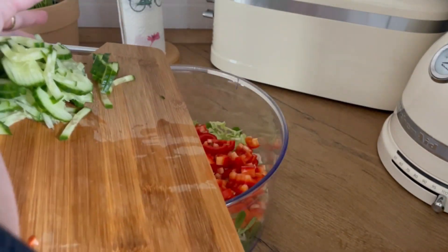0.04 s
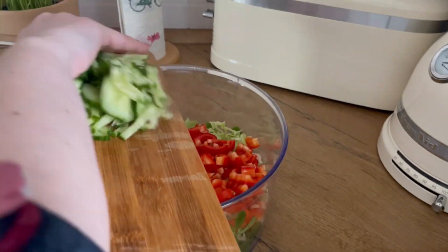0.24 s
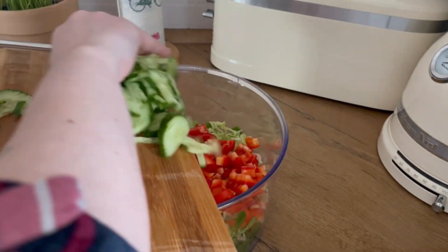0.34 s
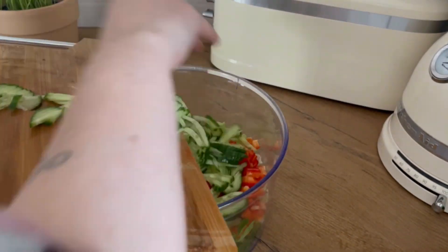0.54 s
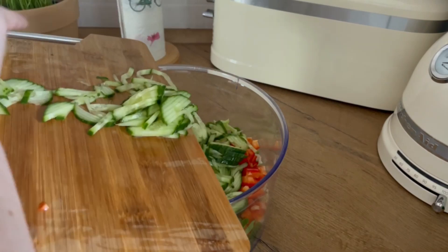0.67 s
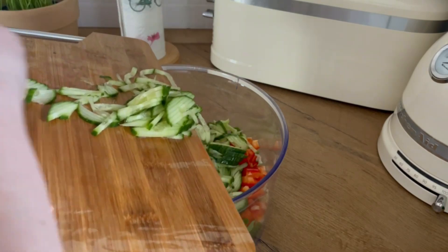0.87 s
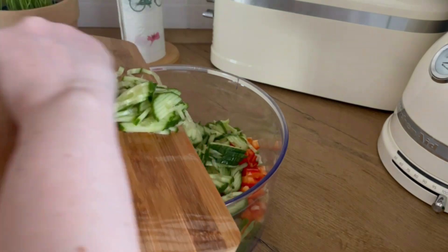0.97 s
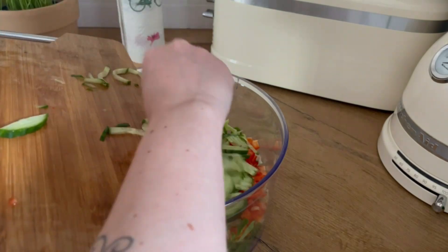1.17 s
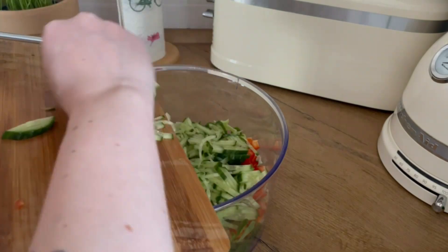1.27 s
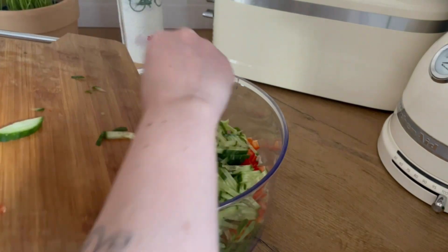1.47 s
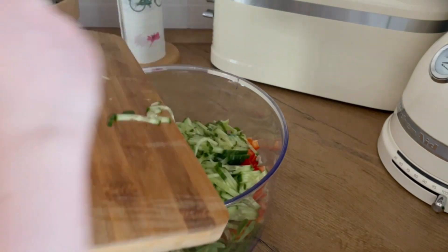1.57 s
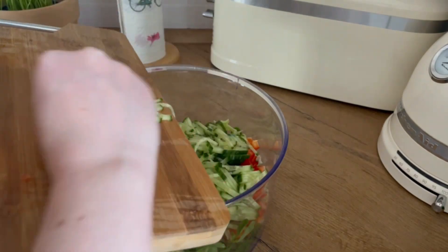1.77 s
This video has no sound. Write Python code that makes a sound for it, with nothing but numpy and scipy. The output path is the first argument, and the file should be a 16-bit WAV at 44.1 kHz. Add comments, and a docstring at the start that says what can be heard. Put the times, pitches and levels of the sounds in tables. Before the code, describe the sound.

Short, hissy scrapes and light taps of a steel blade on a wooden board, heard close in a kitchen. One loud knock of board on bowl comes first, then soft plops of vegetables, over a faint appliance hum.

```python
"""Scraping vegetables into a bowl

A steel blade taps a wet wooden board and drags over it in short strokes; friction rings the blade
and the wet wood hisses. The board knocks on the bowl, chopped pieces plop in, a sleeve rustles.
Behind it, in a small kitchen, an appliance hums on two close tones that beat slowly."""
import sys
import numpy as np
from scipy import signal
from scipy.io import wavfile
from scipy.ndimage import uniform_filter1d

SR = 44100
rng = np.random.default_rng(int(sys.argv[2]) if len(sys.argv) > 2 else 0)


def unload_wav(signal):
    """Save mono or channel-first audio to the path in sys.argv[1] as 16-bit WAV at rate SR, clipped to [-1, 1]."""
    wavfile.write(
        sys.argv[1],
        SR,
        np.round(np.clip(np.atleast_2d(signal).T, -1, 1) * 32767).astype(np.int16),
    )


N = 81585
T = np.arange(N) / SR
HZ = np.fft.rfftfreq(8192, 1 / SR)
IMPACT_T = T[:2 * len(HZ)]

# room noise spectrum (frequency [Hz], gain [dB])
ROOM_NOISE_COLOUR = [(30, -46), (60, -59), (90, -14), (150, -2.5), (220, 1.5), (310, -7), (430, -2),
                     (700, -12.5), (1200, -16), (2200, -28), (4500, -36), (16000, -43)]
# blade strokes, one curve each (time [s], blade ring [dB], wet hiss [dB])
STROKES = [
    [(0, -62.5, -95), (.065, -65, -77), (.135, -54, -61), (.23, -52, -65), (.33, -54, -67),
     (.47, -66.5, -66), (.53, -90, -74), (.6, -78, -75)],
    [(.83, -49.5, -71), (.855, -61, -65), (.877, -47, -81), (.91, -55, -73), (.945, -50.5, -58),
     (1.02, -55, -57), (1.11, -54, -55), (1.143, -46, -70), (1.16, -70, -73)],
    [(1.305, -77, -64), (1.345, -58.5, -89), (1.366, -56.5, -68), (1.38, -58, -79), (1.415, -46.5, -64),
     (1.425, -63, -67)],
    [(1.652, -53.5, -60), (1.7, -46, -59.5), (1.738, -56.5, -74), (1.758, -62.5, -55), (1.82, -50.5, -72),
     (1.85, -49.5, -68)],
]
# blade resonances (frequency [Hz], width [Hz], gain [dB])
BLADE_MODES = [(1328, 42.5, 7), (1593, 215, -1), (2738, 115, 1.5), (3150, 84, 6.5), (3764, 81, 5),
               (4100, 134, 0.5), (5193, 106, 2), (6380, 380, -3), (8110, 300, -7.5), (9470, 210, -7.5)]
# scrape spectrum under the resonances (frequency [Hz], gain [dB])
SCRAPE_COLOUR = [(100, -10.5), (300, -13.5), (900, -3.5), (1500, -9), (2250, -10), (3300, -8), (5800, -9),
                 (7500, -16), (16000, -13)]
# wet wood spectrum (frequency [Hz], gain [dB])
HISS_COLOUR = [(100, -54), (1500, -16), (4000, 0.5), (7000, 2.5), (11000, 7), (13500, 1), (16000, 1.5)]
# blade catching on wood (time [s], duration sigma [s], pitch [Hz], half-width [Hz], level [dB])
CATCHES = [(0.87, 0.008, 4020, 250, -51), (0.948, 0.0057, 5150, 450, -47), (0.961, 0.0092, 3170, 119, -52),
           (1.085, 0.049, 1510, 220, -59), (1.145, 0.0052, 4770, 1500, -51),
           (1.362, 0.0054, 3090, 148, -51.5), (1.701, 0.0097, 3610, 334, -43),
           (1.708, 0.027, 1360, 150, -56), (1.728, 0.0093, 2870, 300, -51.5),
           (1.84, 0.05, 6580, 600, -54.5)]
# pieces landing (time [s], pitch [Hz], level [dB])
PLOPS = [(0, 226, -48), (0.303, 228, -38), (0.363, 232, -47), (0.412, 260, -42.5), (0.461, 230, -46),
         (.799, 250.5, -41.5), (0.984, 232.6, -40.5), (1.02, 220.6, -45), (1.16, 262, -46.5)]
# board thumps, mostly the board hitting the bowl; the row at 0.8225 s is the board ringing under the blade tap
# (time [s], level [dB], treble cutoff [Hz])
KNOCKS = [(0.2337, -27.5, 8900), (0.2353, -20, 2060), (0.2395, -17.5, 3000), (0.2481, -24, 1500),
          (0.2596, -18, 1400), (0.2634, -21.5, 1000), (0.267, -24.5, 2130), (.273, -18, 560),
          (0.403, -35.5, 900), (0.41, -41, 850), (.772, -49, 1100), (0.8225, -41, 1180),
          (1.164, -46.5, 800)]
# board and bowl resonances (frequency [Hz], width [Hz], gain [dB])
BOARD_MODES = [(244.4, 15.3, 11.5), (471, 92, -5.5), (606, 38, -3.5), (697, 52, 1.5), (875, 110, -3),
               (962, 51, 4.5), (1106, 78, -0.5), (1350, 130, -3), (1566, 62, -10), (1865, 114, 0),
               (2930, 270, 3.5)]
# knock spectrum under the resonances (frequency [Hz], gain [dB])
BOARD_COLOUR = [(60, -64.5), (150, -43), (400, -40.5), (1000, -12), (2250, -45), (3400, -11.5), (4500, -11),
                (7000, -7), (9000, -16), (16000, -13)]
# rustle envelope (time [s], level [dB])
SLEEVE_LEVELS = [(.42, -61.5), (.51, -55), (0.561, -63), (.605, -75), (.67, -65.5), (.77, -66.5),
                 (.81, -70.5), (1.16, -62.5), (1.226, -58.5), (1.27, -70), (1.43, -72), (1.47, -100)]
# rustle peaks (frequency [Hz], width [Hz], gain [dB])
SLEEVE_PEAKS = [(2670, 190, 13), (3020, 78, 15), (4170, 160, 9.5), (5050, 270, 15.5)]
# rustle spectrum (frequency [Hz], gain [dB])
SLEEVE_COLOUR = [(200, 11.5), (800, 11.5), (2000, 0.5), (7000, -3), (13000, -23)]
# blade touching down (time [s], level [dB], tilt [dB/octave], boost centre [Hz], boost [dB])
TAPS = [(0.4212, -48.5, -2, 5340, 15), (0.435, -52, 13, 6800, 11), (.643, -52.5, 0, 3230, 11),
        (0.6596, -40, 0, 3460, 7.5), (0.8223, -30, 1.5, 10200, 6.5), (1.2997, -39.5, -0.5, 3000, 1.5),
        (1.4495, -58.5, 2, 7100, 6), (1.65, -38.5, 2.5, 1310, 5.5)]
# tap chatter spectrum (frequency [Hz], gain [dB])
TAP_COLOUR = [(100, -24.5), (400, -27), (900, 4.5), (2250, -28), (3900, -3.5), (5000, 0.5), (10000, -4),
              (13000, -10), (16000, -22)]
# kitchen decay (frequency [Hz], T60 [s]); delay before the tail
ROOM_T60, ROOM_GAP_S = [(200, 0.35), (1500, 0.23), (6000, 0.1), (16000, 0.19)], 0.0013


def amp(db):
    """Decibels to gain."""
    return 10 ** (np.asarray(db) / 20)


def unit_rms(x):
    """Scale to rms 1."""
    return x / np.sqrt(np.mean(x ** 2) + 1e-20)


def unit_energy(x):
    """Scale to energy 1."""
    return x / np.linalg.norm(x)


def lookup(points, hz):
    """Interpolate over log frequency."""
    f, value = np.transpose(points)
    return np.interp(np.log(hz + 1), np.log(f), value)


def add(mix, start_s, sound):
    """Mix in at a start time."""
    part = mix[max(round(start_s * SR), 0):][:len(sound)]
    part += sound[:len(part)]


def bell(centre_hz, half_width_hz):
    """Single peak of height 1."""
    return 1 / (1 + ((HZ - centre_hz) / half_width_hz) ** 2)


def body(colour, modes=()):
    """Gain curve: broad colour plus resonances."""
    peaks = sum(amp(db) ** 2 / (1 + ((HZ ** 2 - hz ** 2) / (width_hz * (HZ + 1))) ** 2)
                for hz, width_hz, db in modes)
    return np.sqrt(amp(lookup(colour, HZ)) ** 2 + peaks)


def ring(x, gain):
    """Minimum-phase, unit-energy filter from a gain curve."""
    log_gain = np.log(np.maximum(np.r_[gain, gain[-2:0:-1]], 1e-6))
    response = np.fft.ifft(np.exp(np.conj(signal.hilbert(log_gain)))).real[:len(HZ)]
    return signal.fftconvolve(x, unit_energy(response))[:len(x)]


def appliance_hum(hz=117.3, db=-60.5, beat_hz=3.53, upper_db=-66, dip_s=0.235):
    """Two close tones beat."""
    rad_per_hz = 2 * np.pi * (T - dip_s)
    lower = amp(db) * np.sin(hz * rad_per_hz)
    upper = amp(upper_db) * np.sin((hz + beat_hz) * rad_per_hz)
    return np.sqrt(2) * (lower - upper)


def room_noise(db=-61.5):
    """Steady, dull noise."""
    return amp(db) * ring(rng.standard_normal(N), body(ROOM_NOISE_COLOUR))


def friction(slips_per_s=23000, spread_db=2, judder_db=1, judder_s=0.008):
    """Dense tiny slips of uneven size, in clumps."""
    slips = (rng.random(N) < slips_per_s / SR) * rng.standard_normal(N)
    slips *= amp(spread_db * np.minimum(rng.exponential(1, N), 4))
    knots_s = np.arange(0, 2, judder_s)
    judder = np.interp(T, knots_s, rng.standard_normal(N)[:len(knots_s)])
    return unit_rms(slips * amp(judder_db * judder))


def wet_hiss(patch_db=2.2, patch_s=0.025, patch_hz=1400):
    """Hiss whose colour wanders in random patches as wet pieces slide and let go."""
    hz, t, spectrum = signal.stft(ring(friction(), body(HISS_COLOUR)), SR, nperseg=256)
    patches = uniform_filter1d(rng.standard_normal(spectrum.T.shape), round(patch_s / t[1]), axis=0)
    patches = unit_rms(uniform_filter1d(patches, round(patch_hz / hz[1]), axis=1))
    return unit_rms(signal.istft(spectrum * amp(patch_db * patches.T), SR)[1][:N])


def wet_crackle(ticks_per_s=130, relative_db=-6, bands=6):
    """Sparse wet ticks spread over treble bands."""
    out = np.zeros(N)
    for hz in np.geomspace(3500, 14000, bands):
        ticks = (rng.random(N) < ticks_per_s / bands / SR) * rng.uniform(-1.05, 1, N)
        out += ring(ticks, bell(hz, half_width_hz=1400))
    return amp(relative_db) * unit_rms(out)


def scraping(edge_s=0.0013):
    """Friction rings the blade; wet wood hisses under its edge."""
    steel_gain, wet_gain = np.zeros((2, N))
    for stroke in STROKES:
        times_s, ring_db, hiss_db = np.transpose(stroke)
        outside_s = np.maximum(np.maximum(times_s[0] - T, T - times_s[-1]), 0)
        contact = np.exp(-outside_s / edge_s)
        steel_gain += contact * amp(np.interp(T, times_s, ring_db))
        wet_gain += contact * amp(np.interp(T, times_s, hiss_db))
    steel = ring(friction(), body(SCRAPE_COLOUR, BLADE_MODES))
    return steel_gain * steel + wet_gain * (wet_hiss() + wet_crackle())


def plops(rise_s=0.008, t60_s=0.19):
    """Soft pieces land and excite only the lowest resonance."""
    out = np.zeros(N)
    envelope = (1 - np.exp(-T / rise_s)) * np.exp(-np.log(1000) * T / t60_s)
    for start_s, hz, db in PLOPS:
        add(out, start_s, amp(db) * envelope * np.sin(2 * np.pi * hz * T))
    return out


def chatter(swell_s, low_cut_hz=500):
    """Tiny contacts swell and die as two surfaces press together."""
    burst = rng.standard_normal(len(IMPACT_T)) * IMPACT_T * np.exp(-IMPACT_T / swell_s)
    highpass = signal.butter(2, low_cut_hz, "high", fs=SR, output="sos")
    return unit_energy(signal.sosfilt(highpass, burst))


def board_knocks(cushion_hz=1400, chatter_ratio=1.5):
    """The board strikes the bowl and settles in thumps, cushioned by the vegetables."""
    out = np.zeros(N)
    board = body(BOARD_COLOUR, BOARD_MODES)
    cushion = signal.butter(2, cushion_hz, fs=SR, output="sos")
    push = signal.sosfilt(cushion, signal.unit_impulse(len(IMPACT_T)))
    for start_s, db, cutoff_hz in KNOCKS:
        force = 10 * (push + chatter_ratio * chatter(swell_s=0.002)) / np.hypot(1, chatter_ratio)
        add(out, start_s, amp(db) * ring(force, board * bell(0, cutoff_hz)))
    return out


def board_clack(peak_s=0.2434, width_s=0.0021, hz=955, db=-12):
    """Hollow peak of the main blow on the bowl."""
    t = T - peak_s
    return amp(db) * np.exp(-(t / width_s) ** 2) * np.cos(2 * np.pi * hz * t)


def sleeve():
    """Cloth rubs as the arm draws back and reaches again."""
    times_s, db = np.transpose(SLEEVE_LEVELS)
    envelope = amp(np.interp(T, times_s, db, -np.inf, -np.inf))
    return envelope * ring(friction(), body(SLEEVE_COLOUR, SLEEVE_PEAKS))


def blade_ring(rise_s=0.00018):
    """Blade modes decay freely after a blow."""
    modes = np.zeros(len(IMPACT_T))
    for hz, width_hz, db in BLADE_MODES:
        envelope = amp(db) * width_hz * np.exp(-np.pi * width_hz * IMPACT_T)
        modes += envelope * np.sin(2 * np.pi * (hz * IMPACT_T + rng.random()))
    return unit_energy(modes * (1 - np.exp(-IMPACT_T / rise_s)))


def blade_taps(chatter_ratio=0.81, tilt_corner_hz=400):
    """The blade meets the board, chatters and rings briefly."""
    out = np.zeros(N)
    octaves = np.log2(1 + HZ / tilt_corner_hz)
    for start_s, db, tilt_db, boost_hz, boost_db in TAPS:
        colour = amp(tilt_db * octaves + boost_db * bell(boost_hz, half_width_hz=1050))
        strike = blade_ring() + chatter_ratio * ring(chatter(swell_s=0.0017), body(TAP_COLOUR))
        add(out, start_s, 10 * amp(db) * unit_energy(ring(strike, colour)))
    return out


def blade_catches():
    """The blade catches on the wood: brief pitched rasps."""
    out = np.zeros(N)
    for peak_s, sigma_s, hz, half_width_hz, db in CATCHES:
        envelope = amp(db) * np.exp(-0.5 * ((T - peak_s) / sigma_s) ** 2)
        out += envelope * ring(friction(), bell(hz, half_width_hz))
    return out


def kitchen(x, tail_db):
    """Direct sound plus a short diffuse tail; treble dies first."""
    hz, t, spectrum = signal.stft(rng.standard_normal(SR // 2), SR, nperseg=256)
    decay = np.exp(-np.log(1000) * t / lookup(ROOM_T60, hz)[:, None])
    tail = signal.istft(spectrum * decay, SR)[1]
    tail *= T[:len(tail)] > ROOM_GAP_S
    return x + amp(tail_db) * signal.fftconvolve(x, unit_energy(tail))[:N]


def scene():
    """All sources in the kitchen, mono."""
    handling = kitchen(scraping() + blade_catches() + blade_taps() + plops() + sleeve(), tail_db=-10.5)
    knocks = kitchen(board_knocks() + board_clack(), tail_db=-15)
    return (handling + knocks + appliance_hum() + room_noise())[None]


def record(dry):
    """Microphone bass cut and band limit."""
    low_cut_hz, high_cut_hz = 85, 15900
    highpass = signal.butter(6, low_cut_hz, "high", fs=SR, output="sos")
    lowpass = signal.firwin(511, high_cut_hz, window=("kaiser", 9), fs=SR)
    return signal.oaconvolve(signal.sosfilt(highpass, dry), lowpass[None], "same")


dry = scene()
out = record(dry)
unload_wav(out)
```